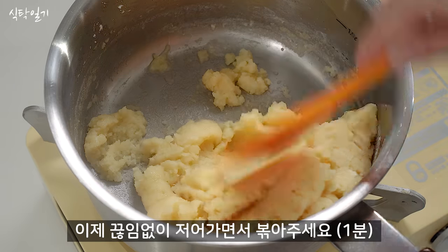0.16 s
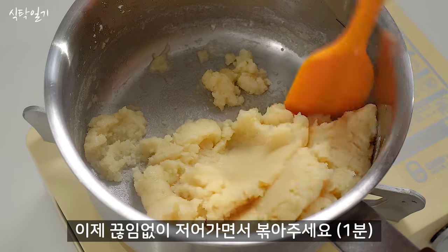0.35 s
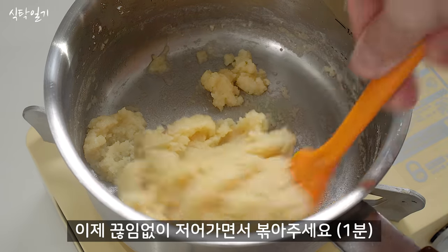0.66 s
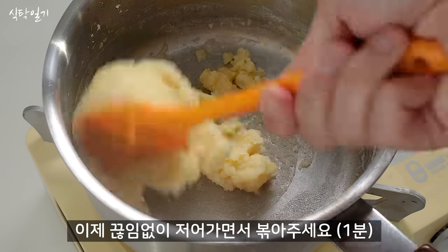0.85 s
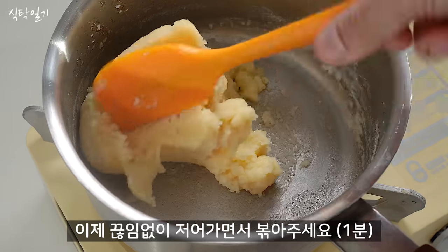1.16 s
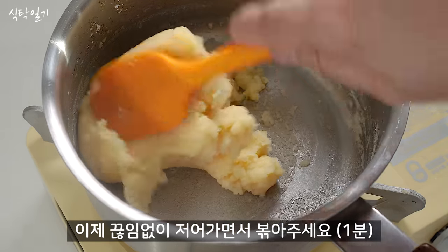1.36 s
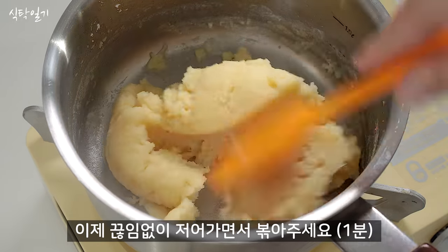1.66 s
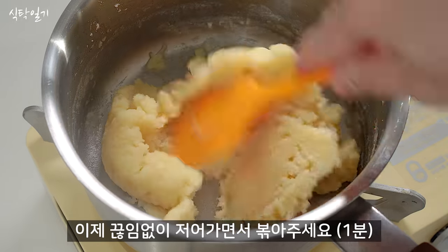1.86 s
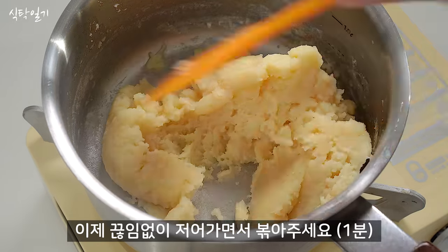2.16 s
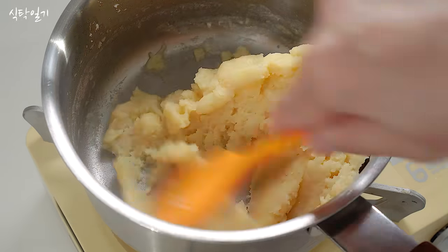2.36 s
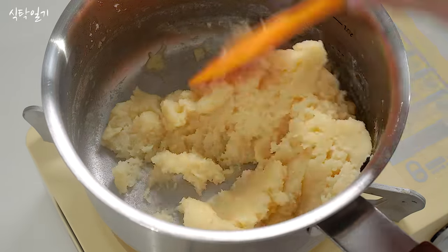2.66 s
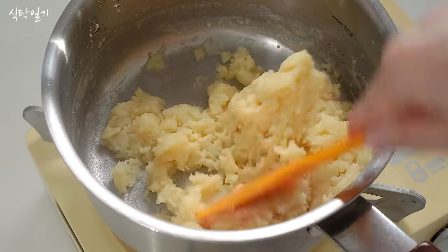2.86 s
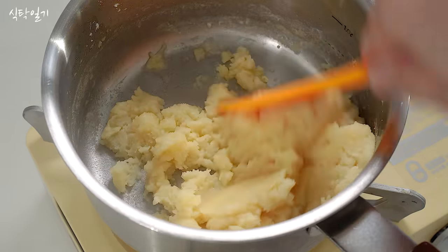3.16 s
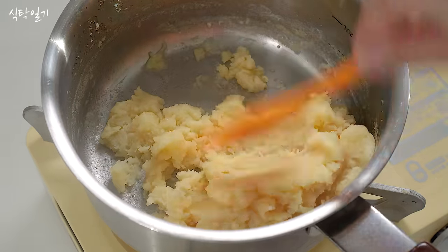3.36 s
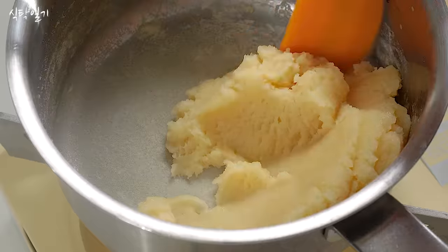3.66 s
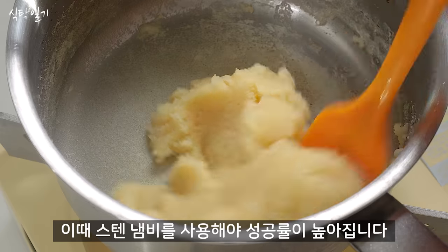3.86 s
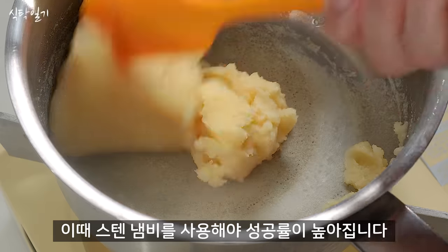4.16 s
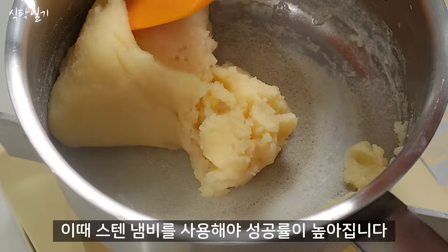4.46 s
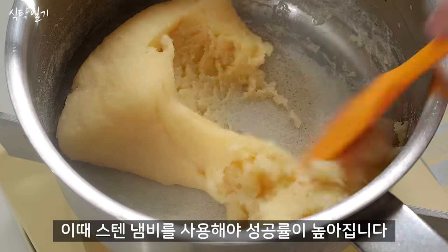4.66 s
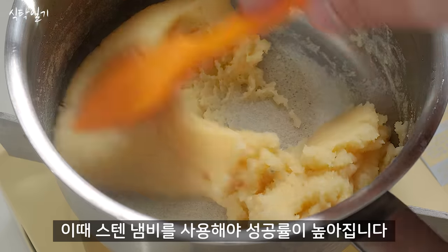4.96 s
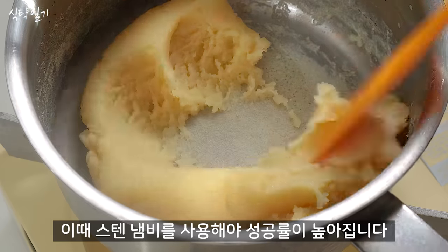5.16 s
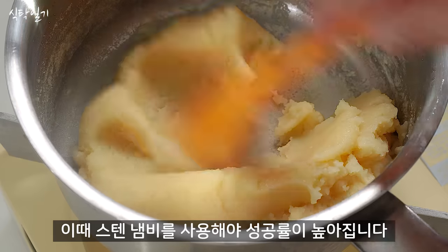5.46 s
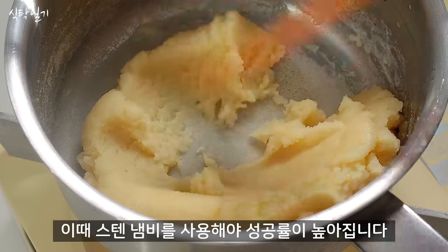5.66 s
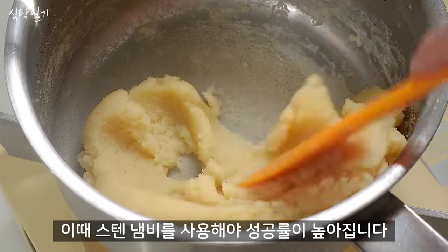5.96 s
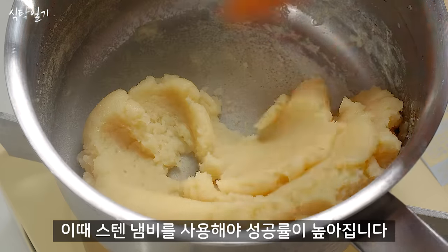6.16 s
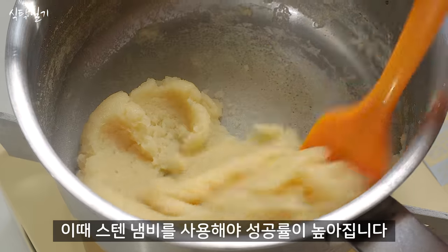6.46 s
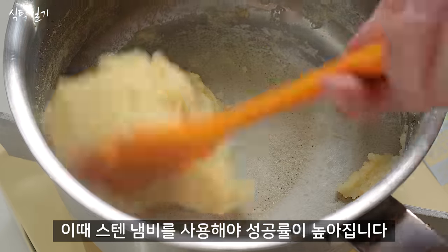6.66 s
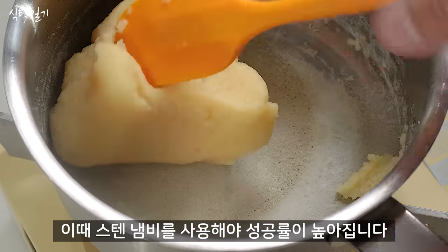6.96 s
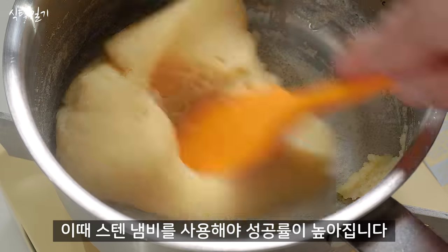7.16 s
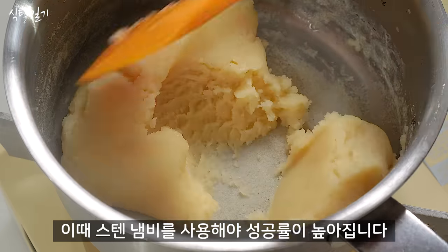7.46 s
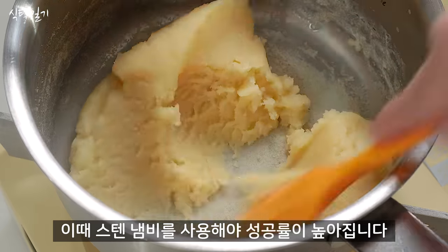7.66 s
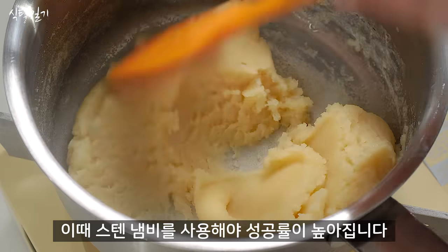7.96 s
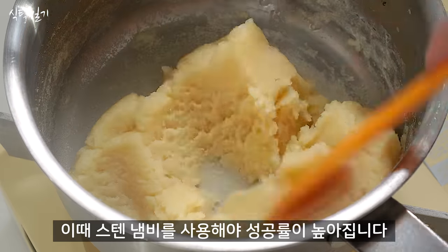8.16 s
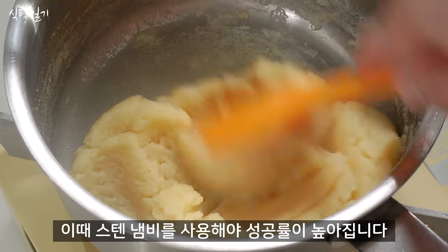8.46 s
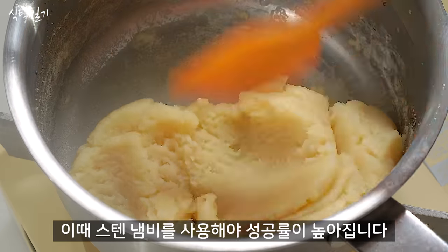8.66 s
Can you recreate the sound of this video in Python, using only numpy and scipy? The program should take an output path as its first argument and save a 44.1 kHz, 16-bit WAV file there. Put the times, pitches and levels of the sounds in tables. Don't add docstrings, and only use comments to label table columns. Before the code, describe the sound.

Wet dough sizzles steadily in a hot steel saucepan, popping sharply, while a soft spatula scrapes, bumps and squelches through it up close.

```python
import sys
import numpy as np
from scipy import signal
from scipy.fft import rfft, irfft
from scipy.io import wavfile
from scipy.ndimage import uniform_filter1d

SR = 44100
rng = np.random.default_rng(int(sys.argv[2]) if len(sys.argv) > 2 else 0)


def natural_amplitude(level_db):
    exponent = np.asarray(level_db, float) / 20
    return 10 ** exponent


def master_out(mix):
    frames = np.transpose(np.atleast_2d(mix))
    ceiling = np.clip(frames, -1, 1)
    pcm = np.round(ceiling * 32767).astype(np.int16)
    wavfile.write(sys.argv[1], SR, pcm)


N = 388080
TIME = np.arange(N) / SR
HZ = np.fft.rfftfreq(N, 1 / SR)

# (peak time [s], length [s], level [dB])
PUFFS = [(0.37, 0.12, -49.5), (0.43, 0.14, -49), (0.55, 0.28, -63), (0.83, 0.16, -58.5), (1.2, 0.18, -68),
         (1.52, .15, -88), (1.86, .25, -84), (3.48, .08, -85), (3.6, 0.2, -59), (3.69, 0.31, -53),
         (3.8, 0.25, -61), (3.9, 0.16, -51.5), (4.0, .12, -70), (4.75, .08, -81), (5.06, .06, -94),
         (5.56, 0.18, -82), (5.81, .1, -84), (5.91, .22, -86), (6.17, 0.12, -58), (6.23, .15, -57),
         (6.32, 0.35, -49), (6.44, 0.17, -44.5), (6.56, 0.25, -64), (6.79, .15, -76), (6.98, 0.24, -64),
         (7.22, 0.24, -78), (7.64, 0.13, -65), (7.72, 0.16, -53.5), (8.125, 0.092, -37), (8.2, 0.32, -51),
         (8.58, 0.15, -64)]
# (frequency [Hz], level [dB per Hz])
AIR_COLOUR = [(12, -46), (20, -14), (65, -4), (103, -7.5), (145, 3.5), (199, 0), (238, 6.5), (259, 1),
              (313, -33), (340, -47), (440, -53), (750, -120)]
AIR_SIDES_DB = [
    [-2.5],
    [2.5],
]
# (frequency [Hz], level [dB per Hz])
IDLE_COLOUR = [(71, -78), (120, -65), (234, -8), (339, -30), (423, -40), (485, -5), (591, 3.5),
               (747, -33.5), (825, 3), (1030, -3.5), (1510, 1), (1910, -5.5), (2300, 5.5), (2990, -26.5),
               (5060, -120)]
# (time [s], peak level [dB], pitch [Hz])
BUMPS = [(0.066, -29, 613), (0.242, -39, 605), (0.885, -29, 614), (0.963, -24, 625), (1.275, -32, 600),
         (1.971, -35, 610), (2.39, -37, 610), (3.247, -38, 630), (3.456, -46, 600), (3.573, -13, 670),
         (3.586, -21, 597), (3.826, -23, 590), (3.868, -18, 664), (3.884, -15, 736), (3.891, -15.5, 647),
         (3.901, -27, 625), (4.314, -40, 604), (5.37, -34, 650), (5.64, -34, 604), (5.885, -27, 625),
         (5.918, -25.5, 626), (6.151, -25, 650), (6.281, -30, 626), (6.411, -21, 680), (6.422, -15, 630),
         (6.433, -16, 660), (6.439, -16, 668), (6.448, -11, 724), (6.457, -16, 588), (6.481, -20, 640),
         (6.49, -20, 695), (6.512, -21, 600), (6.524, -28, 653), (6.951, -33, 700), (6.962, -29, 650),
         (7.639, -33, 666), (7.694, -21, 614), (7.713, -29, 674), (8.1125, -8.5, 710), (8.1205, -12, 608),
         (8.136, -22, 670), (8.319, -32, 605), (8.387, -33, 600)]
# (time of full pressure [s], length [s], rub on steel [dB], wet squelch [dB], freed steam [dB])
SWEEPS = [(0.006, 0.49, -39.5, -38, -31.5), (0.682, 0.64, -42, -38, -38), (0.796, 0.79, -41, -49, -38),
          (0.583, 0.18, -47, -46, -34), (1.54, 0.33, -42, -31, -41), (1.81, 0.98, -54.5, -42, -35.5),
          (1.967, 0.18, -44.5, -35.5, -32), (2.42, 0.73, -53, -45.5, -36), (2.793, 0.29, -74, -42, -34),
          (3.17, 0.35, -59, -51, -36), (3.86, 0.55, -32, -40, -37), (3.962, 0.3, -36, -34, -37),
          (4.22, 0.84, -47.5, -45.5, -46), (4.598, 0.36, -51, -37, -52), (5.038, 0.35, -49, -42.5, -39),
          (5.521, 0.38, -47, -46, -33.5), (5.91, 0.29, -39, -47, -41), (6.38, 0.97, -39, -55, -46),
          (6.497, 0.57, -38, -34.5, -65), (6.737, 0.72, -44, -70, -47), (7.237, 0.31, -58, -40.5, -35),
          (8.065, 0.3, -48, -37, -36), (8.203, 0.5, -42, -54, -46), (8.473, 0.89, -47, -48, -34.5)]
# (time of full pressure [s], length [s], rub [dB], squelch [dB])
DIGS = [(0.39, 0.21, -46.5, -48), (0.48, .15, -66, -48), (0.985, 0.41, -43.5, -45),
        (1.146, 0.49, -46.5, -43), (1.386, 0.11, -50, -36), (1.608, .1, -43, -49), (2.72, 0.062, -55, -61),
        (3.057, 0.11, -55, -72), (3.265, 0.16, -47.5, -55), (3.458, 0.038, -43, -54),
        (3.58, 0.13, -31.5, -47), (3.675, 0.3, -48, -42), (3.89, 0.081, -25, -28), (5.362, 0.048, -57, -55),
        (5.81, 0.049, -44, -55), (6.16, 0.066, -35.5, -45), (6.283, 0.056, -38, -36),
        (6.443, 0.3, -27.5, -40), (6.957, 0.067, -40, -25.5), (7.087, 0.44, -50.5, -46),
        (7.593, 0.17, -54, -41), (7.701, 0.15, -36, -35), (8.116, 0.12, -26.5, -47), (8.56, 0.19, -42, -65)]
# (frequency [Hz], level [dB per Hz])
HOLLOW_COLOUR = [(220, -63), (380, -37.5), (456, -22), (489, -6.5), (542, -6), (591, -3.5), (1080, -19),
                 (1380, -15), (1730, -29), (2000, -22.5), (2500, -30), (3250, -43), (5500, -120)]
# (start [s], end [s], level change [dB], rises ignored)
LIFTS = [
    (2.08, 2.236, -1.5),
    (2.858, 3.095, -2.5),
    (3.326, 3.43, -4),
    (4.85, 4.98, 3.5),
    (5.2, 5.332, -2),
    (5.66, 5.806, -0.5),
    (6.07, 6.14, -3),
    (7.4, 7.538, -0.5),
]
# (time [s], peak level [dB], pitch [Hz], decay by 60 dB [s])
SMACKS = [(0.5613, -27, 1500, .01), (0.586, -34, 1500, .01), (0.918, -30, 1500, .01),
          (1.213, -24, 1200, 0.012), (1.862, -31, 1700, .01), (2.26, -32, 1600, .01),
          (2.448, -37, 1600, .012), (2.799, -34, 1600, .012), (2.838, -28, 1500, .012),
          (3.144, -32, 1100, 0.0082), (3.24, -33, 1200, 0.0089), (3.885, -22, 1700, .012),
          (3.893, -18, 1100, 0.03), (3.952, -22, 1310, 0.009), (4.013, -26, 1400, 0.0093),
          (4.38, -33, 1500, .01), (5.255, -38, 1500, .01), (5.3735, -28, 1300, 0.023),
          (5.64, -30, 1200, .012), (5.81, -20, 1600, 0.012), (5.9647, -30, 1500, .012),
          (6.153, -34, 1000, 0.013), (6.248, -26, 1500, 0.011), (6.448, -15, 1040, 0.022),
          (6.951, -20, 1880, 0.05), (7.105, -29, 1500, .01), (7.2366, -24, 1600, .012),
          (7.325, -33, 1500, .01), (7.806, -31, 1700, 0.011), (7.876, -33, 1530, 0.012),
          (7.927, -26, 2300, 0.013), (8.083, -20, 1090, 0.016), (8.119, -29, 1300, 0.04),
          (8.415, -33, 1500, .01)]
# (time [s], peak level [dB], bubble pitch [Hz], weight of the dull part [share])
POPS = [(0.0238, -11, 7880, 0.8), (0.406, -9, 9400, 0.33), (0.5455, -11, 9000, 0.6),
        (0.7752, -12, 9320, 0.8), (0.822, -11, 7790, 0.66), (0.9333, -9.5, 8300, 0.62),
        (1.2125, -4.5, 7440, 0.62), (1.6087, -9.5, 9350, 0.66), (1.7564, -9.5, 7600, 0.58),
        (1.8612, -7, 8100, 0.47), (2.0273, -14, 7070, 0.89), (2.4076, -11, 7070, 0.46),
        (2.4598, -10, 8970, 0.98), (2.8746, -12, 9440, 0.42), (3.0944, -9, 9170, 0.35),
        (3.1433, -14, 8410, 0.95), (3.457, -3, 6500, 0.8), (4.7407, -6.5, 8100, 1),
        (5.3371, -6.5, 8500, 0.3), (5.3722, -8, 9430, 0.65), (5.606, -14, 8720, 0.8),
        (5.8087, -8.5, 5170, 0.96), (6.153, -15, 2600, 0.66), (6.2477, -9, 8950, 0.84),
        (6.481, -8, 8500, 0.4), (6.9215, -4, 4800, 0.76), (7.0888, -16, 8010, 0.8),
        (7.2809, -13, 7420, 0.73), (7.8049, -7, 7500, 0.71), (8.0826, -8, 7640, 0.9)]
# (time [s], peak level [dB], bubble pitch [Hz])
TICKS = [(0.049, -18.5, 3490), (0.082, -17, 7460), (0.1814, -19, 7960), (0.285, -20, 5900),
         (0.295, -24, 9300), (0.3348, -20, 9200), (0.3606, -28, 9200), (0.4817, -22, 9300),
         (0.5844, -21, 3690), (0.6816, -22, 9300), (0.761, -25, 3050), (0.9056, -21, 9380),
         (0.928, -17, 9300), (1.0143, -16, 9100), (1.3733, -15, 7470), (1.5698, -15, 7630),
         (1.6239, -15, 8200), (1.8363, -16, 7470), (1.9394, -15, 8400), (2.1447, -20, 7500),
         (2.2445, -23, 9300), (2.6996, -18, 7320), (2.7683, -22, 8000), (2.793, -24, 8200),
         (2.883, -20, 9070), (2.935, -16, 9300), (3.1385, -18, 9300), (3.884, -27, 3500),
         (4.012, -21, 7600), (4.277, -20, 8720), (4.4945, -20, 6160), (5.35, -16, 7930),
         (5.4754, -15, 7870), (5.531, -16, 8450), (6.8581, -20, 9000), (7.1204, -22, 7900),
         (7.8277, -19, 5700), (8.3192, -16, 8000), (8.7654, -16, 9100)]
# (frequency [Hz], width [Hz], level [dB])
WALL = [(3370, 800, -6), (7600, 1400, -12), (14000, 2500, -7)]
# (time [s], fizz level [dB])
SIMMER = [(0.0, -42), (0.3, -36), (0.9, -37.5), (1.3, -37.5), (1.62, -32.5), (1.7, -38), (2.2, -34.5),
          (3.3, -34.5), (3.7, -34), (4.3, -36), (4.9, -33), (5.4, -33), (5.85, -31.5), (6.4, -31),
          (6.8, -36.5), (7.4, -35), (7.67, -33), (8.8, -36.5)]
# (frequency [Hz], level [dB per Hz])
STEAM_COLOUR = [(880, -47), (1500, -3), (1910, -10), (2250, -1.5), (3670, 1.5), (5350, -4.5), (7570, -1),
                (9820, -3.5), (13200, -4), (15000, -2.5)]
# (frequency [Hz], left-right likeness [0-1])
SAME = [(60, 0.11), (130, -0.0), (290, 0.35), (640, 0.89), (1410, 0.19), (3100, 1), (6820, 0.0019),
        (15000, 0.72)]
# (frequency [Hz], phase [rad])
LEAD = [(0, 1), (260, 1.5), (520, 0.67), (950, 0), (4050, 0.47), (5860, 1.6), (7670, -0.5), (9990, 1.33),
        (15200, 0.92), (16600, 8)]
# (frequency [Hz], left minus right [dB])
TILT = [(60, -4.0), (110, -8), (200, -12.5), (380, 8.5), (700, -10), (1290, -4.5), (2380, -2), (4400, -5.5),
        (8120, 2), (15000, -1.5)]

SWEEP_RISE, DIG_RISE, PUFF_RISE, SPRAY_RISE = 0.48, 0.28, 0.29, 0.18
REST_RUB_DB, REST_SQUELCH_DB, STILL_AIR_DB = -77, -61, -102


def evened(x):
    return x / np.sqrt(np.mean(x ** 2) + 1e-20)


def read(points, hz):
    f, value = np.transpose(points)
    return np.interp(np.log(hz + 1), np.log(f + 1), value)


def coloured(x, points):
    hz = np.minimum(np.fft.rfftfreq(8192, 1 / SR), 14600)
    log_gain = np.log(natural_amplitude(np.maximum(read(points, hz), -100)))
    mirrored = np.r_[log_gain, log_gain[-2:0:-1]]
    phase = -np.imag(signal.hilbert(mirrored))[:len(log_gain)]
    response = irfft(np.exp(log_gain + 1j * phase))[None, :4096]
    return signal.oaconvolve(x, response, axes=1)[:, :N]


def band(x, lo_hz, hi_hz):
    return signal.sosfilt(signal.butter(2, [lo_hz, hi_hz], "band", fs=SR, output="sos"), x)


def above(x, edge_hz):
    return irfft(rfft(x) / (1 + (edge_hz / (HZ + 1)) ** 14), N)


def split(x, edge_hz):
    thick_share = 1 / (1 + (HZ / edge_hz) ** 6)
    z = rfft(x)
    return irfft(z * (1 - thick_share), N), irfft(z * thick_share, N)


def bursts(per_s, spread_db):
    size = natural_amplitude(spread_db * np.minimum(rng.exponential(1, (2, N)), 4.6))
    size = size * rng.standard_normal((2, N))
    return evened(size * (rng.random((2, N)) < per_s / SR))


def flutter(fast_hz, db):
    slow = irfft(rfft(rng.standard_normal(N)) / (1 + (HZ / fast_hz) ** 2), N)
    return natural_amplitude(db * evened(slow))


def swells(rows, rise):
    s, length, db = np.transpose(rows)[:, :, None]
    t = np.arange(0, N / SR + .004, .002)
    late = (t - s) / length
    fall_db = 20 * np.maximum(late / (1 - rise), -late / rise)
    power = (natural_amplitude(db - fall_db) ** 2).sum(0)
    return np.interp(TIME, t, power)


def blade():
    sweeps, digs = np.array(SWEEPS), np.array(DIGS)
    levels = []
    for column, rest_db in ((2, REST_RUB_DB), (3, REST_SQUELCH_DB)):
        power = swells(sweeps[:, [0, 1, column]], SWEEP_RISE)
        power = power + swells(digs[:, [0, 1, column]], DIG_RISE)
        levels.append(10 * np.log10(power + natural_amplitude(rest_db) ** 2))
    return levels


def air():
    lumps = np.array([flutter(20, 5.6) for _ in "LR"])
    gust = evened(coloured(rng.standard_normal((2, N)) * lumps, AIR_COLOUR))
    db = 10 * np.log10(swells(PUFFS, PUFF_RISE) + natural_amplitude(STILL_AIR_DB) ** 2)
    db = db + 0.39 * np.minimum(db + 99, 0)
    return natural_amplitude(db + 5.5 + np.array(AIR_SIDES_DB)) * gust


def idle_pan():
    ring_hz, ring_width_hz, ring_db, murmur_db = 597, 15, -60.5, -52
    rub_db, squelch_db = blade()
    murmur = evened(coloured(rng.standard_normal((2, N)) * flutter(20, 2.1), IDLE_COLOUR))
    murmur = murmur * natural_amplitude(murmur_db + 0.53 * np.clip(squelch_db + 44, -15, 5))
    r = np.exp(-np.pi * ring_width_hz / SR)
    resonator = [1, -2 * r * np.cos(2 * np.pi * ring_hz / SR), r * r]
    ring = signal.lfilter([1], resonator, rng.standard_normal(N)[None].repeat(2, 0))
    return murmur + natural_amplitude(ring_db + 0.22 * (rub_db + 46.5)) * evened(above(ring, 430))


def bumps():
    out, t = np.zeros(N), np.arange(3000) / SR
    for s, db, hz in BUMPS:
        swell = (1 - np.exp(-t / 0.0044)) ** 2 * natural_amplitude(db - 3.5 - 60 * t / 0.033)
        hum = np.sin(2 * np.pi * hz * t) + 1.4 * np.sin(2 * np.pi * 0.914 * hz * t)
        out[round(s * SR):][:3000] += swell * hum
    return out * [[1.15], [.2]]


def spatula():
    rub_db, squelch_db = blade()
    slips = evened(coloured(bursts(8000, 1.9) * flutter(48, 0.89), HOLLOW_COLOUR))
    squelch = evened(band(bursts(5000, 1.9) * flutter(27, 0.26), 1060, 2500))
    return natural_amplitude(rub_db - 5.5) * slips + natural_amplitude(squelch_db - 10) * squelch


def lifted(x):
    low_hz, high_hz, edge_s = 760, 2000, .008
    db = np.zeros(N)
    for start, end, dip_db in LIFTS:
        db += dip_db * np.clip(np.minimum(TIME - start, end - TIME) / edge_s, 0, 1)
    middle = irfft(rfft(x) / (1 + (low_hz / (HZ + 1)) ** 8) / (1 + (HZ / high_hz) ** 8), N)
    return x + (natural_amplitude(np.minimum(db, 0)) - 1) * middle


def smacks():
    rise_s = 0.0004
    out, t = np.zeros((2, N)), np.arange(1500) / SR
    for s, db, hz, t60 in SMACKS:
        tear = band(rng.standard_normal(1500), hz / 1.74, hz * 1.7)
        tear = tear * natural_amplitude(-60 * t / t60) * (1 - np.exp(-t / rise_s))
        at = round(s * SR)
        out[:, at:at + 1500] += natural_amplitude(db - 7.5) * tear / abs(tear).max()
    return out


def pops():
    tick_db, tick_dull = 4.5, 0.59
    rattle = 0.36
    crisp = 0.55
    out, t = np.zeros((2, N)), np.arange(300) / SR
    ticks = [(s, db + tick_db, hz, tick_dull) for s, db, hz in TICKS]
    for s, db, hz, dull in list(POPS) + ticks:
        echoes = rattle * rng.standard_normal((2, 300)) * natural_amplitude(-60 * t / 0.0045) * (1 - np.exp(-t / 0.00097))
        echoes[:, 0] = [1, .4]
        cycle = np.sin(2 * np.pi * hz * t[:60]) * np.exp(-2.2 * hz * t[:60])
        pop = signal.lfilter(cycle, 1, echoes)
        low = signal.lfilter([.45], [1, -.55], pop)
        at = round((s + 0.0015) * SR)
        out[:, at:at + 300] -= natural_amplitude(db + 5) * (pop - (1 - dull) * low)
    wall = np.r_[-crisp, 1, np.zeros(298)]
    for hz, width, db in WALL:
        wall += natural_amplitude(db) * 0.24 * np.sin(2 * np.pi * hz * t) * np.exp(-np.pi * width * t)
    out = signal.lfilter(wall, 1, out)
    return signal.lfilter([1, -1], [1, -.72], out)


def steam():
    lingers = 1.46
    spray_db, spray_s = -27.5, 0.069
    s, db = np.transpose(SIMMER)
    simmer = natural_amplitude(np.interp(TIME, s, db)) ** 2
    freed = swells([(s, lingers * length, db) for s, length, _, _, db in SWEEPS], SWEEP_RISE)
    spray = swells([(s, spray_s, db + spray_db) for s, db, _, _ in POPS], SPRAY_RISE)
    return 10 * np.log10(simmer + freed + spray)


def sizzle():
    wet_db = blade()[1] + 45
    thick_db = -10 + 0.12 * wet_db
    hiss = 0.83 * rng.standard_normal((2, N))
    fizz = 0.48 * bursts(3000, 2.3) * flutter(36, 0.3)
    crackle = 0.2 * bursts(160, 1.1) * natural_amplitude(0.65 * np.clip(wet_db, -12, 8))
    drive = (hiss + fizz + crackle) * flutter(36, 0.18)
    thin, thick = split(coloured(drive, STEAM_COLOUR), 5500)
    return natural_amplitude(steam() + 2) * (evened(thin) + natural_amplitude(thick_db - 1.27) * evened(thick))


def ports(pair):
    same = np.clip(read(SAME, np.maximum(HZ, 640)), 0, 1) ** 0.26
    left, own = rfft(pair)
    right = same * np.exp(-1j * read(LEAD, HZ)) * left + np.sqrt(1 - same ** 2) * own
    half_tilt = natural_amplitude(read(TILT, HZ) / 2)
    return irfft([left * half_tilt, right / half_tilt], N)


def scene():
    worked = lifted(idle_pan() + spatula() + sizzle())
    sharp = above(smacks() + pops(), 430)
    pan = worked + sharp + bumps()
    return air() + above(ports(pan), 182)


def roll_off(x):
    return signal.sosfilt(signal.butter(12, 16300, fs=SR, output="sos"), x)


def record(dry):
    turn = np.array([[1, 1], [1, -0.92]]) / np.sqrt(2)
    hz, _, z = signal.stft(turn @ dry, SR, "cosine", nperseg=2048, noverlap=1024)
    power = abs(z) ** 2 + 1e-20
    around = uniform_filter1d(power, size=25, axis=1)
    evenness = 0.75 * np.clip(hz / 900 - .7, 0, 1)[:, None]
    flat = z * (around / power + 1e-9) ** (evenness / 2)
    flat *= np.sqrt(around / uniform_filter1d(abs(flat) ** 2 + 1e-20, size=25, axis=1))
    x = turn @ signal.istft(flat, SR, "cosine", nperseg=2048, noverlap=1024)[1][:, :N]
    x = dry + above(x - dry, 600)
    edge = signal.firwin(1023, 15720, window=("kaiser", 6), fs=SR)
    mix = signal.oaconvolve(x, edge[None], "same", axes=1)
    return roll_off(mix)


dry = scene()
out = record(dry)
master_out(out)
```